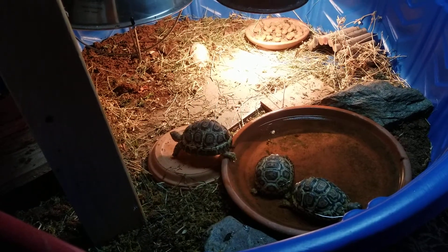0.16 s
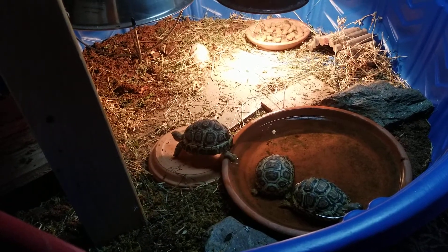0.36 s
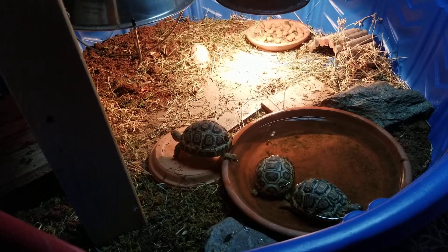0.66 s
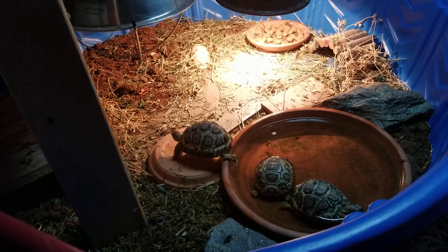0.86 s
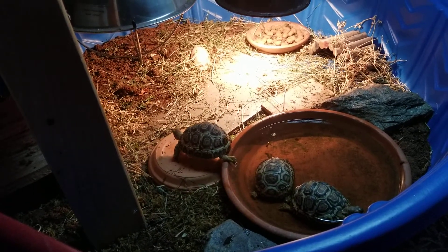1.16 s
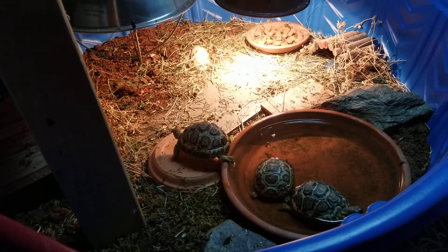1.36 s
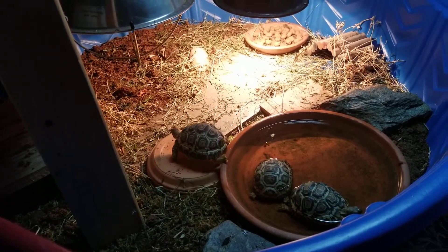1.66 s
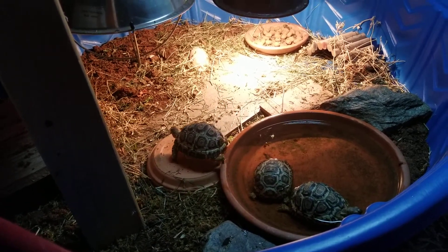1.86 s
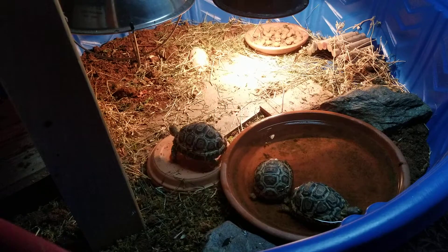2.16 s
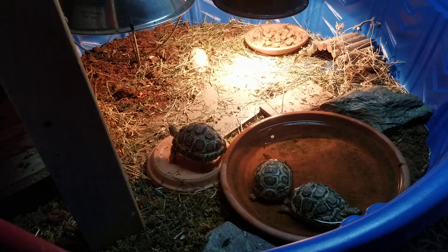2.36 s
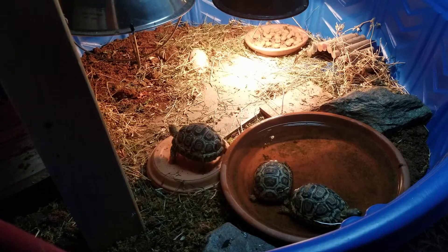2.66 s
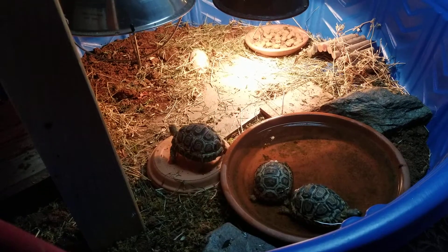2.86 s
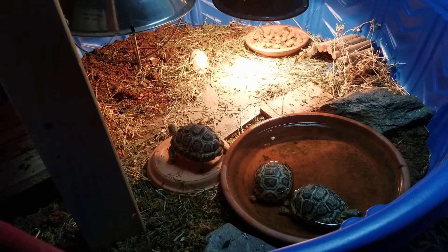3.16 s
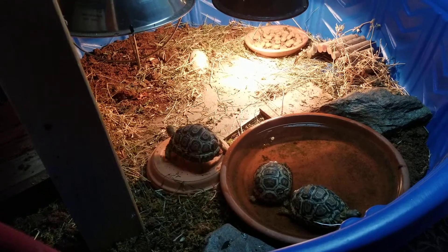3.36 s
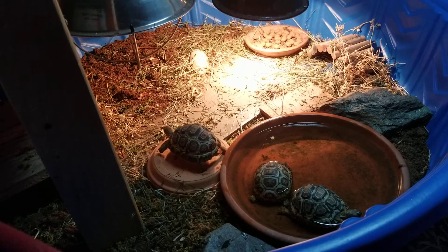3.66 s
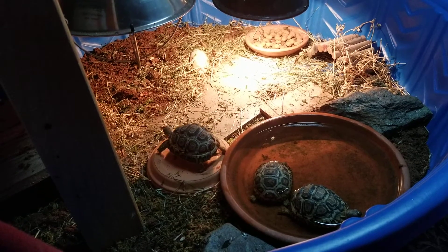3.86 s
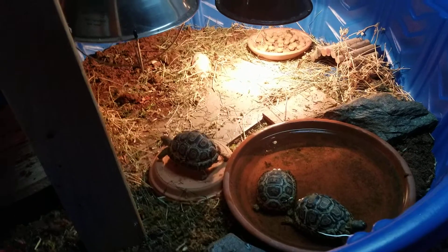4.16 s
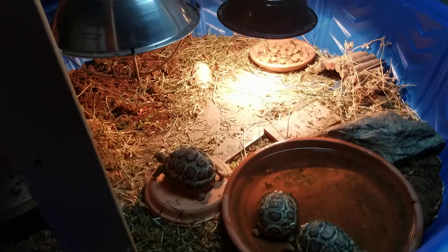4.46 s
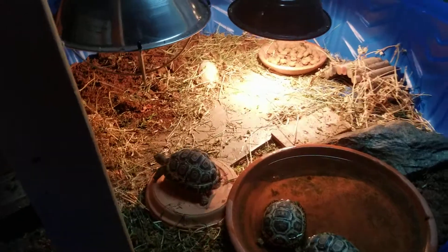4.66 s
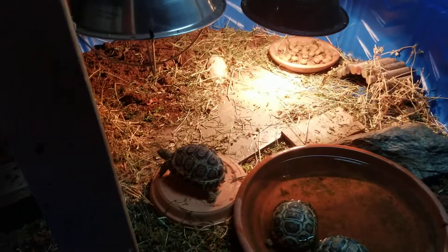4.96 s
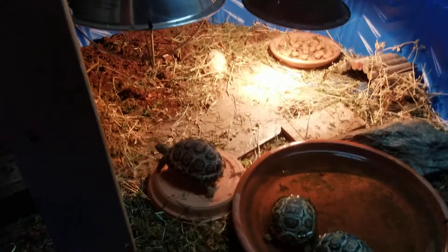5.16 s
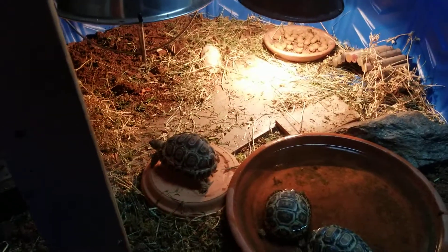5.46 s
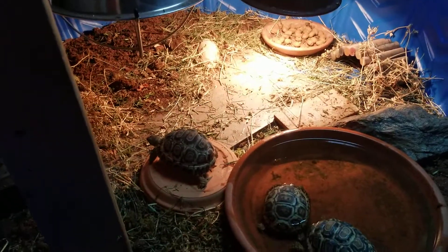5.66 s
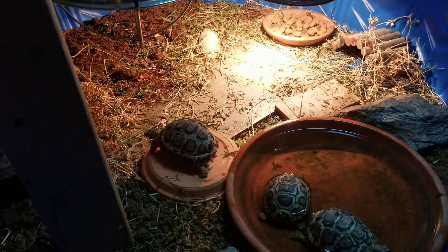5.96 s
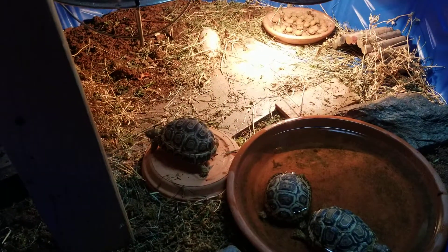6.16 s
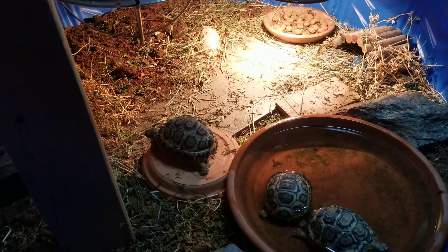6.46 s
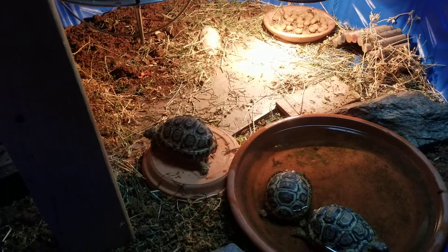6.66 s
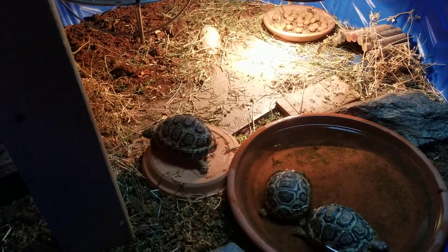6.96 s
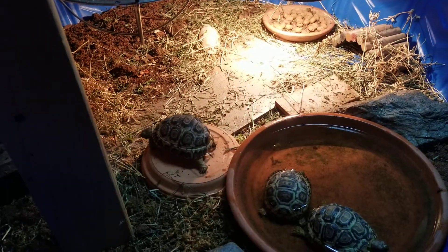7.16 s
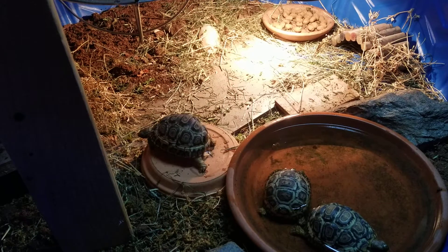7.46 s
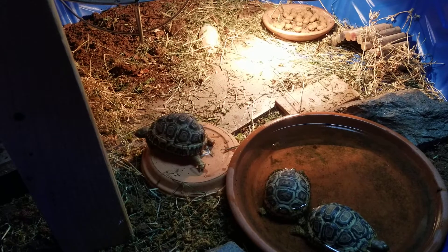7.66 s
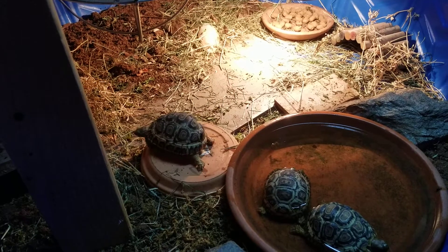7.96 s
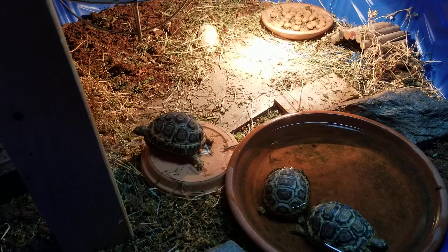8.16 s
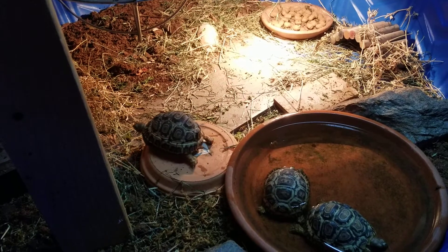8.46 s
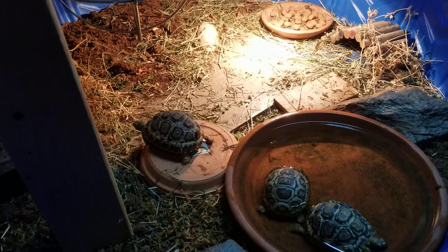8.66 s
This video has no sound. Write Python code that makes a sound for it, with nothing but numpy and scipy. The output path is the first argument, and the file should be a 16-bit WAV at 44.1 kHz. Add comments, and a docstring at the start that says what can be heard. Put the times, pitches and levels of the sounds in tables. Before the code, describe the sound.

Close stereo pickup in a small, lively room with quiet low room tone. Small shells knock on a clay dish in a plastic tub: heavy, separate thuds first, then closer and softer, with one sharp bright clack among them. Afterwards come short juddering bumps with a low boom, a few dry claw ticks, faint straw rustling and finally near quiet.

```python
"""Small tortoises clamber among clay dishes in a plastic tub, in a small, lively room; straw rustles from the start.
Shells knock on a dish, at first far apart, then closer and softer: the tub flexes in a short thud, modes ring.
Among the knocks falls one sharp clack of bright noise, heard mostly through the room.
Then shells judder along a dish in stick-slip bumps over a slow boom, with dry claw ticks and faint, thin high rings.
Last come more high rings and rustling straw. Filtered noise gives straw, hiss and room tone; harder is brighter."""
import sys
import numpy as np
from scipy import signal
from scipy.fft import rfft, irfft
from scipy.io import wavfile
from scipy.ndimage import uniform_filter1d

SR = 44100
rng = np.random.default_rng(int(sys.argv[2]) if len(sys.argv) > 2 else 0)


def pcm_store(signal):
    """Save signal as 16-bit PCM."""
    levels = np.round(np.clip(np.atleast_2d(signal), -1, 1) * 32767)
    wavfile.write(sys.argv[1], SR, levels.astype(np.int16).T)


N = 388554
T = np.arange(int(.8 * SR)) / SR  # clock of one short sound, in seconds

# single knocks of a shell on a dish: start_s, thud_hz, thud_db, ring_db (dish), hollow_db
KNOCKS = [(0.6859, 141, -22, -30.5, -3), (1.4793, 145.6, -25, -39, 1.5), (2.0535, 161, -29, -38, 8.5),
          (2.441, 171.5, -37, -40.5, 2), (2.7575, 155, -38.5, -52.5, 9), (3.0059, 155.4, -36.5, -55.5, -1),
          (3.1979, 154, -40.5, -61.5, 8.5), (3.343, 147, -42, -67.5, 2), (3.4476, 145, -48.5, -75.5, 3)]
# juddering bumps along a dish: start_s, length_s, slip_hz, thud_db, ring_db (dish), hollow_db
BUMPS = [(2.162, 0.087, 60.6, -27, -45.5, -2), (3.709, 0.059, 53.7, -51, -74.5, -4),
         (4.084, 0.064, 171.4, -25.5, -38, 10), (4.28, 0.066, 176.3, -31, -46, 7),
         (4.469, .063, 168.3, -31.5, -51.5, 7), (4.852, 0.072, 168.6, -32, -45, 10.5),
         (5.041, 0.058, 174, -28.5, -42.5, 5), (5.389, 0.067, 175.5, -29.5, -43, -3.5),
         (5.581, 0.064, 171.3, -30, -41, 0), (6.049, 0.061, 170.7, -32.5, -45, 6),
         (6.468, 0.059, 171.8, -22, -38, -2.5), (6.648, 0.062, 170.8, -32.5, -52.5, 1.5),
         (6.99, 0.062, 177.3, -22, -37.5, -3.5), (7.181, 0.08, 169.3, -28.5, -45.5, -9),
         (7.52, 0.058, 165.8, -23, -39, -11.5), (7.681, 0.054, 172.6, -30.5, -43.5, -11),
         (7.994, 0.071, 169.5, -35.5, -55, -1.5)]
# claw ticks on the clay: start_s, level_db (roughly the peak)
TICKS = [(4.505, -50.5), (4.527, -53), (4.593, -51), (4.601, -52), (4.62, -50), (4.65, -40), (4.707, -46.5),
         (4.737, -61), (4.763, -52.5), (6.779, -58.5)]
# faint, thin high rings: start_s, length_s, pitch_hz, level_db
HIGH_RINGS = [(4.650, .04, 3660, -67), (4.640, .08, 2520, -69), (4.700, .09, 2520, -68),
              (8.48, .14, 2487, -75), (8.585, .11, 2487, -75)]
# feet push through the straw: start_s, swell_s, level_db (at the top of the swell, before the crackle)
RUSTLES = [(0.0, .3, -82.5), (0.37, 0.05, -71.5), (0.529, 0.054, -75), (1.0, 0.066, -83),
           (1.14, 0.018, -68.5), (1.694, 0.018, -82), (2.565, 0.025, -79), (3.66, 0.13, -79.5),
           (4.055, .07, -65), (4.48, 0.17, -69.5), (4.98, .3, -77), (5.385, 0.051, -66),
           (6.642, .09, -83.5), (8.28, .03, -79.5), (8.47, 0.24, -74.5)]
# swells of a faint high hiss: peak_s, rise_s, fall_s, level_db (at the peak)
HISS_SWELLS = [(0.6, .22, .07, -74.5), (5.3, 1, 1.3, -81.5), (5.439, 0.16, 0.11, -73.5),
               (8.78, .2, .2, -79)]

# resonances of the plastic tub: mode_hz, level_db (relative), t60_s
TUB_MODES = [(108.27, 1.5, 0.48), (138.8, -5.5, 0.59), (153.3, 2, 0.5), (174.7, 1, 0.55), (201.1, -1, 0.48),
             (225.8, -2, 0.2), (244.7, -11.5, 0.6), (278.1, -13, 0.23)]
# resonances of the clay dish: mode_hz, level_db (relative), t60_s
DISH_MODES = [(312, 1, .4), (345, 0, .33), (428, 2, .36), (499, -3, .3), (523, -1, .3), (552, -1, .3),
              (586, -1, .33), (660, -4, .3), (714, 0, .35), (801, 2, .36), (932, -1, .32), (990, 0, .32),
              (1054, -3, .32), (1152, 2, .28), (1262, 2, .32), (1463, 0, .29), (1501, 0, .31),
              (1586, -2, .28), (1610, -1, .28), (1727, -1, .28), (1813, -1, .33), (2032, 0, .28),
              (2113, 0, .45), (2738, 3, .56)]

# noise spectrum of the tub under a thud: freq_hz, level_db (relative, per Hz)
TUB_COLOUR = [(40, -25), (72, -9), (92, -6), (110, -3.5), (126, -1.5), (175, -5.5), (265, -7.5),
              (330, -16.5), (450, -32.5), (900, -92)]
# what a knock excites in the dish: freq_hz, level_db (relative, per Hz)
KNOCK_COLOUR = [(150, -16.5), (310, 1), (420, -7), (530, 6.5), (660, -0.5), (790, -3.5), (900, -4),
                (1200, -7), (1500, -10), (2000, -22), (2500, -30), (3100, -46.5), (7000, -70),
                (10000, -78.5)]
# what a bump excites in the dish: freq_hz, level_db (relative, per Hz)
BUMP_COLOUR = [(120, -10), (290, 3), (370, -4.5), (450, 5), (580, -10), (750, -10), (900, -18.5),
               (1150, -22), (1450, -31), (2200, -38), (3000, -45), (7000, -63), (10000, -66)]
# spectrum of the hard clack: freq_hz, level_db (relative, per Hz)
CLACK_COLOUR = [(200, -21), (500, 16.5), (900, 0.5), (1400, 2), (2000, -1.5), (3000, -8.5), (4000, -7.5),
                (6500, -9), (8500, -27), (12000, -22.5), (15500, -26)]
# spectrum of rustling straw, shared by the claw ticks: freq_hz, level_db (relative, per Hz)
STRAW_COLOUR = [(300, -11.5), (700, -4), (1500, -3), (2300, 2), (3000, -3.5), (3900, 0.5), (5000, 1),
                (6800, -0.5), (8500, -26), (10500, -14), (13000, -12), (15500, -16.5)]
# spectrum of the high hiss: freq_hz, level_db (relative, per Hz)
HISS_COLOUR = [(5000, -28.5), (8500, -16), (10500, -8), (12500, -0.5), (15500, -4.5)]
# spectrum of the quiet room: freq_hz, level_db (relative, per Hz)
ROOM_TONE = [(25, -22), (45, -2), (65, -1), (105, -3), (190, -16), (260, -20), (400, -31), (830, -42),
             (2400, -47.5), (3300, -53.5), (5300, -47.5), (8800, -65.5), (12500, -48), (15500, -48.5)]
# stereo width, the share of noise that differs between the ears: freq_hz, side_minus_mid_db
WIDTH = [(60, -19), (130, -11), (250, -12), (500, -8), (1000, 0.5), (15000, 0)]

BOOM_HZ, BOOM_T60_S = 62.46, 0.48
CLACK_S, CLACK_DB, CLACK_T60_S = 2.1155, -44, 0.34
ROOM_T60_S, ROOM_TONE_DB = 0.36, -54.5
HOLLOW_HZ = 284
TOP_HZ = 15750
# a thud of HARD_DB is a firm contact; each dB softer dulls the dish by so many dB per octave, up to a limit
HARD_DB = -22
KNOCK_DULLING, KNOCK_DULLEST_DB = 1.07, 28
BUMP_DULLING, BUMP_DULLEST_DB = 0.96, 8
RATTLE_DB = 6.5  # brightening per octave of a dish that rattles on the rocking tub
# boom relative to the thud; in a fast bump it sinks by BOOM_SAG for each dB below a firm contact
KNOCK_BOOM_DB, BUMP_BOOM_DB, BOOM_SAG = -15.5, -8, .6
# every thud shakes the straw: level relative to the thud, swell time
SHAKE_DB, SHAKE_SWELL_S = -52, .035
# straw settles in SETTLE_T60_S, plus SETTLE_PER_SWELL seconds per second of push; some always stirs
SETTLE_T60_S, SETTLE_PER_SWELL, STRAW_REST_DB = 0.46, 6.9, -93


def knocks():
    """Each knock flexes the tub for about three cycles; the dish rings and the room fills."""
    out = np.zeros((2, N))
    for start_s, thud_hz, thud_db, ring_db, hollow_db in KNOCKS:
        dull_db = min(KNOCK_DULLING * (HARD_DB - thud_db), KNOCK_DULLEST_DB)
        flex_shape = np.sin(np.pi * np.minimum(T / 0.0195, 1) ** 1.1)
        flex = -np.sin(2 * np.pi * thud_hz * T) * flex_shape
        tub = undb(-14.5) * ring(TUB_MODES, rise_s=0.04, spread=1.5)
        tub = tub + undb(-4) * wash(TUB_COLOUR, 0.29, rise_s=0.01, direct=0)
        low = undb(thud_db) * (level(flex, -0.49) + tub + undb(KNOCK_BOOM_DB) * boom(0.014))
        clay = dish(KNOCK_COLOUR, dull_db, hollow_db, rise_s=0.0261, direct=0.34, modes_db=-11)
        add(out, start_s, pan(low, 3.2) + pan(undb(ring_db) * clay, 4.5))
    return out


def bumps():
    """A shell sticks and slips along a dish: an uneven shudder grows, lets go and leaves the tub ringing."""
    out = np.zeros((2, N))
    for start_s, length_s, slip_hz, thud_db, ring_db, hollow_db in BUMPS:
        softer_db = HARD_DB - thud_db
        # slips as slow as the boom rock the tub fully and rattle the dish; faster ones boom less when soft
        off_boom = 1 - np.exp(-((slip_hz - BOOM_HZ) / 40) ** 2)
        boom_db = off_boom * (BUMP_BOOM_DB - BOOM_SAG * softer_db)
        dull_db = off_boom * min(BUMP_DULLING * softer_db, BUMP_DULLEST_DB)
        dull_db = dull_db - (1 - off_boom) * RATTLE_DB

        # every slip draws its own pitch and size, joined by straight glides
        slips_s = np.arange(int(len(T) / SR * 200)) / slip_hz
        draws = rng.standard_normal((len(slips_s), 2))
        stretch, size = (np.interp(T, slips_s, column) for column in draws.T)
        press = np.interp(T / length_s, [0, .14, .55, .9, 1.2], [0.046, 0.66, 0.9, 1.0, 0.0023])
        phase = 2 * np.pi * np.cumsum(slip_hz * (1 + .045 * stretch)) / SR
        shudder = -np.sin(phase) * press * undb(2.9 * size)

        tub = undb(-4.5) * ring(TUB_MODES, rise_s=0.015, spread=2.6)
        tub = tub + undb(-13) * wash(TUB_COLOUR, 0.49, rise_s=0.051, direct=0.058)
        low = undb(thud_db) * (level(shudder, -1.1) + tub + undb(boom_db) * boom(0.72 * length_s))
        clay = dish(BUMP_COLOUR, dull_db, hollow_db, rise_s=0.036, direct=0.061, modes_db=-15.5)
        add(out, start_s, pan(low, 2.7) + pan(undb(ring_db) * clay, 0.88))
    return out


def clack():
    """One hard, bright contact, heard mostly through the room; the dish rings on below it."""
    out = np.zeros((2, N))
    crack = undb(CLACK_DB) * wash(CLACK_COLOUR, CLACK_T60_S, rise_s=.018, direct=0.37)
    clay = undb(-46) * dish(KNOCK_COLOUR, 3.3, 3, rise_s=0.24, direct=0.061, modes_db=-12.0)
    add(out, CLACK_S, pan(crack, 7.3) + pan(clay, 3))
    return out


def dish(colour, dull_db, hollow_db, rise_s, direct, modes_db):
    """Dish modes and room reflections, coloured by the contact: soft ones lose treble."""
    flat = [(20, 0), (20000, 0)]
    body = wash(flat, ROOM_T60_S, rise_s, direct)
    body = body + undb(modes_db) * ring(DISH_MODES, 0.66 * rise_s, spread=3.0)
    hz = np.fft.rfftfreq(len(T), 1 / SR)
    # a soft contact loses dull_db for each of the three octaves above 560 Hz
    softness = undb(-dull_db * np.log2(np.clip(hz / 560, 1, 8)))
    # where the shell lands decides how much the lowest, hollow modes speak
    place = undb(hollow_db * np.exp(-((hz - HOLLOW_HZ) / 75) ** 2))
    clay = irfft(rfft(body) * gains(colour, len(T)) * softness * place, len(T))
    return level(clay * np.interp(T, [0, .001, .6, .75], [0, 1, 1, 0]), 0)


def boom(rise_s):
    """The lowest mode of the tub: a damped sine that swells over rise_s."""
    return level(fade(BOOM_T60_S, rise_s) * np.sin(2 * np.pi * BOOM_HZ * T), 0)


def ring(modes, rise_s, spread):
    """Damped modes; each reaches the two ears spread radians apart at 1 kHz, a quarter cycle at most."""
    out = 0
    for mode_hz, mode_db, t60_s in modes:
        apart = min(spread * mode_hz / 1000, np.pi / 2) * rng.choice([-1, 1])
        phase = rng.uniform(0, 2 * np.pi) + apart * np.array([[.5], [-.5]])
        out = out + undb(mode_db) * fade(t60_s, rise_s) * np.sin(2 * np.pi * mode_hz * T + phase)
    return level(out, 0)


def wash(colour, t60_s, rise_s, direct):
    """Noise in a brief first arrival, then as reflections that pile up and fade."""
    envelope = fade(t60_s, rise_s) + direct * fade(0.084, 0.0013)
    return level(noise(colour, len(T)) * envelope, 0)


def ticks():
    """Claws catch on the clay: a dry tick of noise with a short tail."""
    out = np.zeros((2, N))
    for start_s, level_db in TICKS:
        envelope = np.exp(-T / 0.0021) + .022 * fade(.25, .005)
        tick = noise(STRAW_COLOUR, len(T)) * envelope
        add(out, start_s, pan(undb(level_db) * 0.4 * tick, 2.9))  # 0.4: from noise rms towards peak level
    return out


def high_rings():
    """Faint, thin high rings: sines that waver in pitch and strength."""
    out = np.zeros((2, N))
    for start_s, length_s, pitch_hz, level_db in HIGH_RINGS:
        waver = uniform_filter1d(rng.standard_normal((3, len(T))), size=400)
        waver = waver / waver.std()
        # the two ears waver apart in pitch and together in strength
        phase = 2 * np.pi * np.cumsum(pitch_hz * (1 + 0.01 * waver[:2]), axis=1) / SR
        strength = np.sin(np.pi * np.minimum(T / length_s, 1)) * undb(2 * waver[2])
        add(out, start_s, pan(undb(level_db) * np.sqrt(2) * np.sin(phase) * strength, 2.8))
    return out


def straw():
    """Straw rustles in fine, uneven crackles: each push or thud stirs it, then it settles."""
    shakes = [(s, SHAKE_SWELL_S, thud_db + SHAKE_DB) for s, *_, thud_db, _, _ in KNOCKS + BUMPS]
    power = np.full(N, undb(STRAW_REST_DB) ** 2)
    for start_s, swell_s, level_db in RUSTLES + shakes:
        first = int(start_s * SR)
        age_s = np.arange(N - first) / SR
        t60_s = SETTLE_T60_S + SETTLE_PER_SWELL * swell_s
        settle = np.exp(-np.log(1000) * np.maximum(age_s - swell_s, 0) / t60_s)
        stir = np.minimum(age_s / swell_s, 1) * settle
        power[first:] += (undb(level_db) * stir) ** 2
    # a new random level every 128 samples
    crackle = np.repeat(rng.standard_normal(N // 128 + 1), 128)[:N]
    return pan(noise(STRAW_COLOUR, N) * np.sqrt(power) * undb(1.8 * crackle), 1.8)


def hiss():
    """The topmost hiss: high noise that swells and sinks exponentially around each peak."""
    t = np.arange(N) / SR
    swells = []
    for peak_s, rise_s, fall_s, level_db in HISS_SWELLS:
        distance = np.maximum((peak_s - t) / rise_s, (t - peak_s) / fall_s)
        swells.append(undb(level_db) * np.exp(-distance))
    return pan(noise(HISS_COLOUR, N) * np.linalg.norm(swells, axis=0), 2)


def room_tone():
    """The quiet room: steady noise, heaviest in the bass."""
    return pan(noise(ROOM_TONE, N) * undb(ROOM_TONE_DB), 3)


def noise(colour, size):
    """Coloured stereo noise, mid of rms 1, alike in the bass and unrelated in the treble."""
    mid, side = rfft(rng.standard_normal((2, size)))
    side = side * gains(WIDTH, size)
    stereo = irfft(np.array([mid + side, mid - side]) * gains(colour, size), size)
    return stereo / stereo.mean(axis=0).std()


def gains(points, size):
    """Gain at each frequency of a sound of this size, drawn through (Hz, dB) points on a log scale."""
    hz, db = np.transpose(points)
    return undb(np.interp(np.log(np.fft.rfftfreq(size, 1 / SR) + 1), np.log(hz), db))


def fade(t60_s, rise_s):
    """Swell over rise_s while dying away by 60 dB in t60_s."""
    return (1 - np.exp(-(T / rise_s) ** 2)) * np.exp(-np.log(1000) * T / t60_s)


def level(x, db):
    """Scale a short sound so that its energy, spread over 120 ms, has this level."""
    mid = np.atleast_2d(x).mean(axis=0)
    return x * undb(db) / np.sqrt(np.sum(mid ** 2) / (.12 * SR))


def undb(db):
    """Decibels to gain."""
    return 10 ** (np.asarray(db) / 20)


def pan(x, db):
    """Lean a sound to the left by db, half up on the left and half down on the right."""
    return x * undb(np.array([[db], [-db]]) / 2)


def add(out, start_s, x):
    """Mix a sound in at its start time, cut at the end of the scene."""
    i = int(start_s * SR)
    out[:, i:i + x.shape[-1]] += x[..., :N - i]


def scene():
    """All the contacts, the high rings, the straw and the hiss over the room tone."""
    contacts = knocks() + bumps() + clack() + ticks()
    return contacts + high_rings() + straw() + hiss() + room_tone()


def record(dry):
    """The recorder cuts the top with a steep low-pass."""
    top_cut = signal.ellip(10, .2, 80, TOP_HZ, fs=SR, output="sos")
    return signal.sosfilt(top_cut, dry)


dry = scene()
out = record(dry)
pcm_store(out)
```